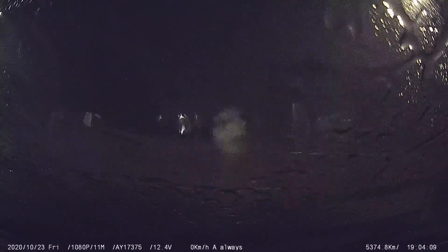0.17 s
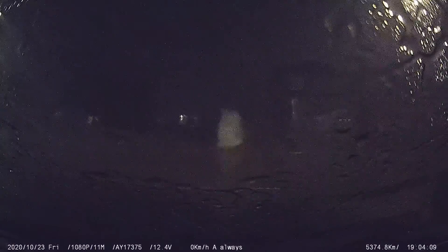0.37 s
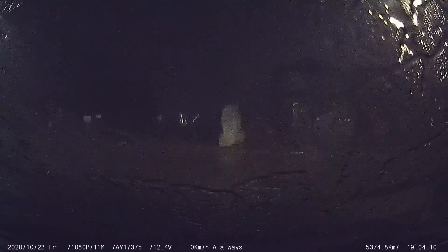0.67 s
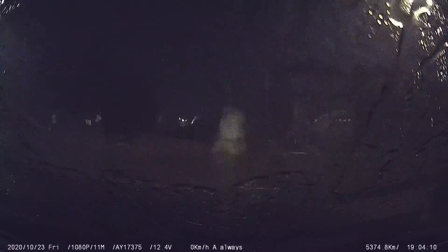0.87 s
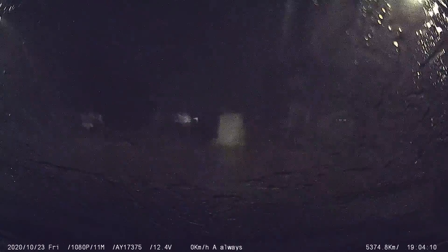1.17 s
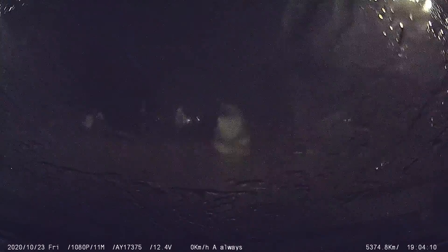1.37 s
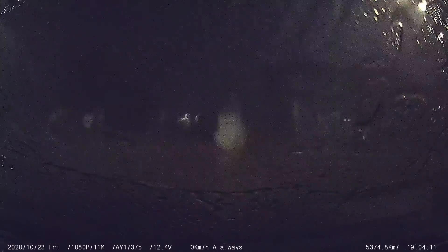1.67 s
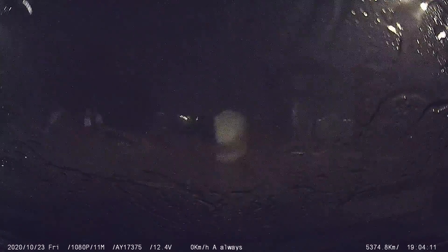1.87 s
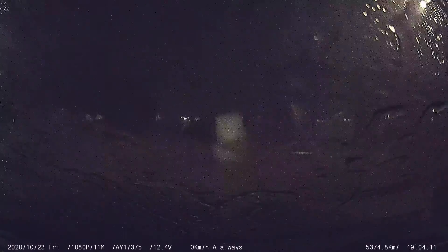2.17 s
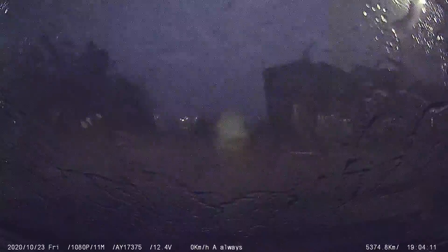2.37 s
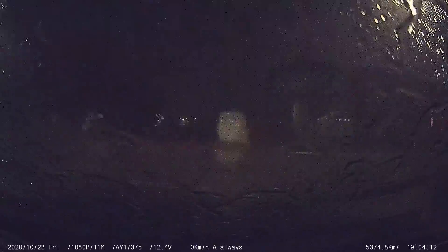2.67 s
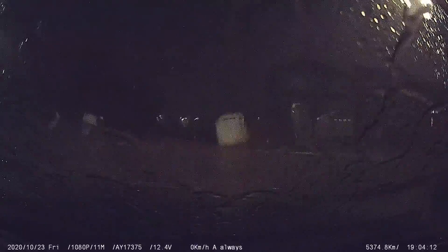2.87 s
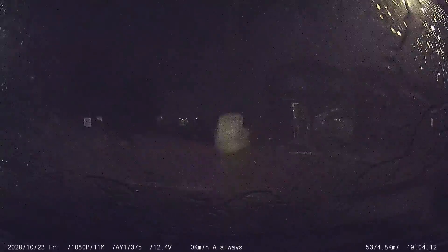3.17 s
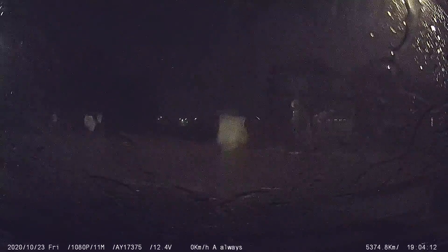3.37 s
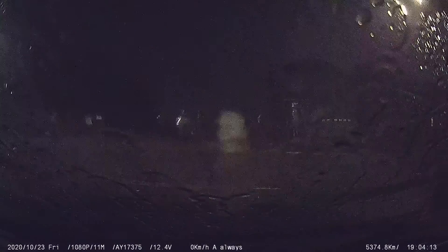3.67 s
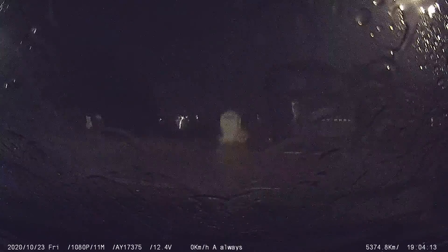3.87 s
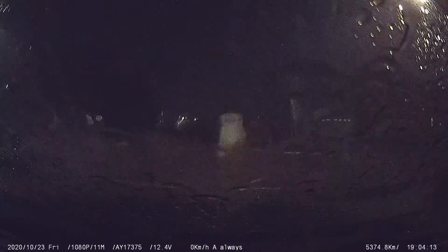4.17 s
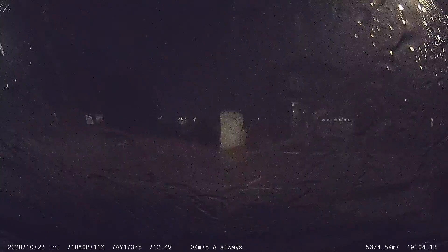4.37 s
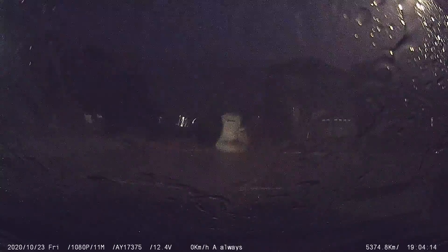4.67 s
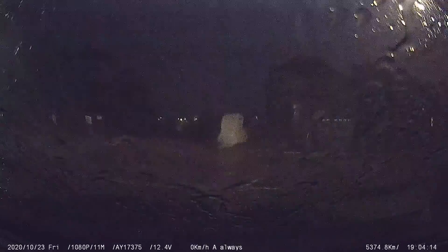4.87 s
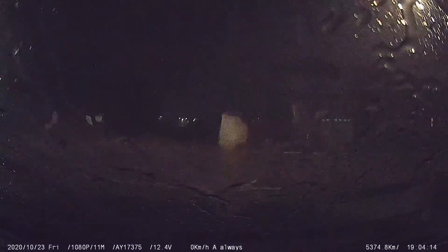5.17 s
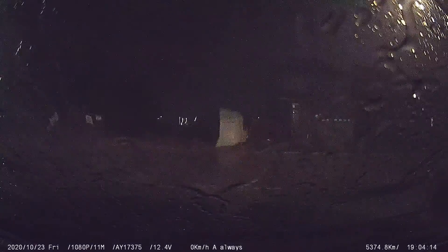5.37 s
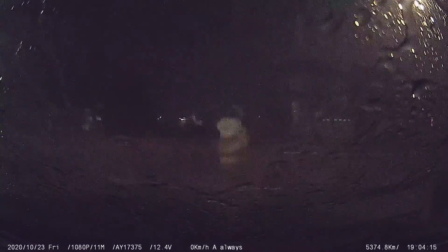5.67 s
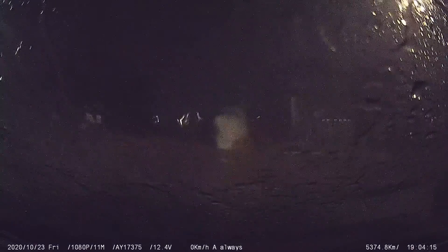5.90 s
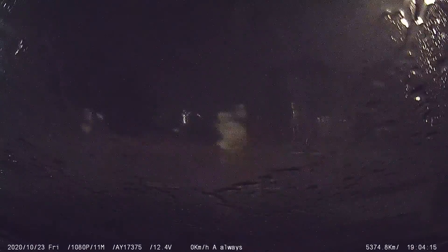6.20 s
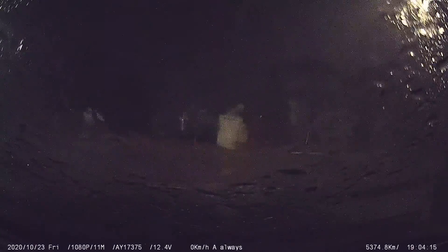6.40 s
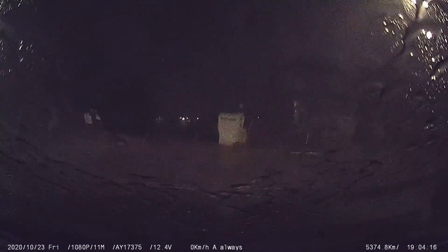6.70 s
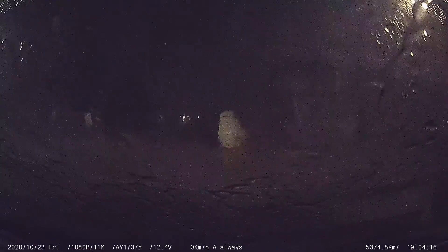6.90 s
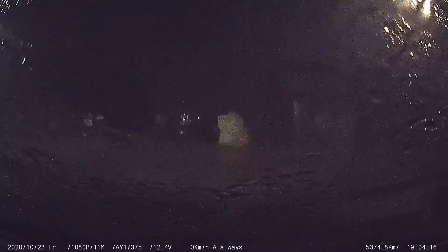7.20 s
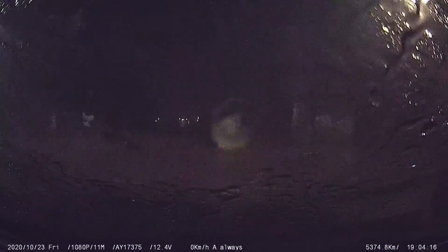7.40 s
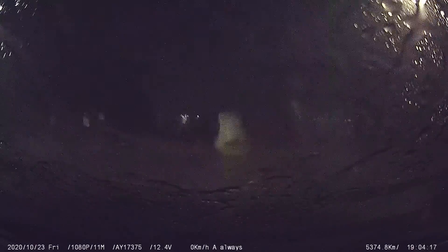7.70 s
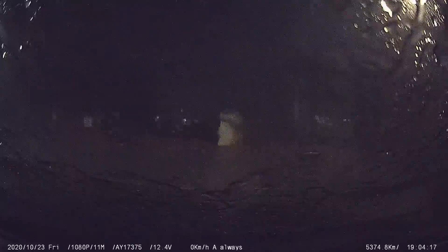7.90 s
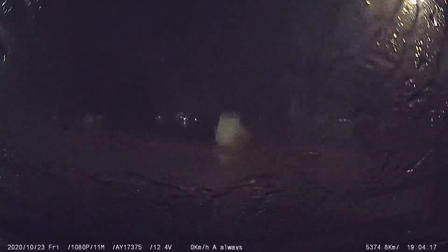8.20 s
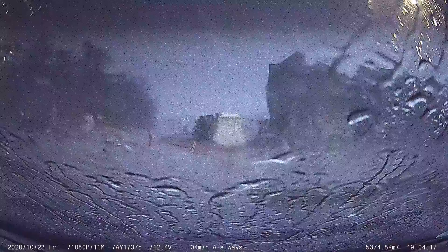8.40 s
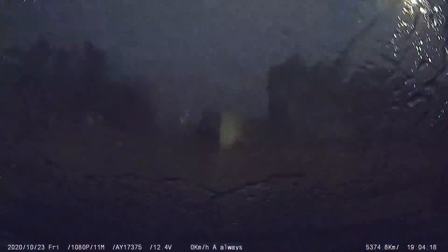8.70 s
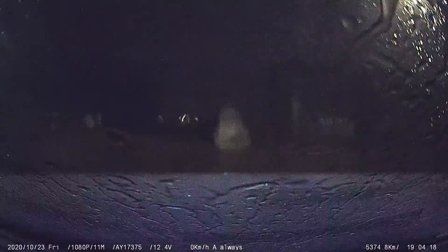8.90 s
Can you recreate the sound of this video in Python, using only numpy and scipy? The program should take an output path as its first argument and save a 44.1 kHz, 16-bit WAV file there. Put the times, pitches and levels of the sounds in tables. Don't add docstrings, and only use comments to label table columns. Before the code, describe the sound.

Heard from a small, dull-sounding microphone inside a parked car: steady rain rattles roof, panels and glass over low gusty rumble. Hailstones knock hard in the first two seconds, ease into lighter scattered hits, then a heavy surge arrives after six seconds with the hardest blow before eight. The rain then thins, with a few last knocks.

```python
import sys
import numpy as np
from scipy import signal
from scipy.fft import rfft, irfft
from scipy.io import wavfile
from scipy.ndimage import uniform_filter1d

SR = 44100
rng = np.random.default_rng(int(sys.argv[2]) if len(sys.argv) > 2 else 0)


def rack_gain(trim_db):
    fader = np.asarray(trim_db, float)
    return 10 ** (fader / 20)


def file_out(sig):
    cols = np.atleast_2d(sig).T
    lim = np.clip(cols, -1, 1)
    pcm = np.round(lim * 32767).astype(np.int16)
    wavfile.write(sys.argv[1], SR, pcm)


N = 399105
HZ = np.arange(8193) * SR / 16384


def causal(db):
    cepstrum = irfft(db * np.log(10) / 20)
    cepstrum[1:8192] *= 2
    cepstrum[8193:] = 0
    return irfft(np.exp(rfft(cepstrum)))[:6000]


def shape(points):
    hz, db = np.transpose(points)
    return np.interp(np.log(HZ + 1), np.log(hz), db)


def camera_db():
    average_hz, top_hz = 4000, 7760
    null_db = 1.32 * 20 * np.log10(np.abs(np.sinc(HZ / average_hz)) + 0.004)
    return null_db - np.clip((HZ - top_hz) * 0.3, 0, 34)


def before_camera(heard_db, hz):
    return heard_db - np.interp(hz, HZ, camera_db())


def band(lo_hz, hi_hz, db):
    lower_edge = 1 + (lo_hz / (HZ + 1)) ** 10
    upper_edge = 1 + (HZ / hi_hz) ** 8.7
    db = db - 10 * np.log10(lower_edge * upper_edge)
    heard_power = np.mean(rack_gain(2 * (db + camera_db())))
    return causal(db) / np.sqrt(heard_power)


def through(x, response):
    return signal.oaconvolve(x, response)[:N]


def running(x, response):
    lead = len(response)
    return signal.oaconvolve(np.concatenate([x[lead:0:-1], x]), response)[lead:lead + N]


def strikes(start_s, gain):
    return np.bincount(np.clip((start_s * SR).astype(int), 0, N - 1), gain, N)


def knocks(start_s, level_db, rise_s, t60_s, filt=through):
    t = np.arange(SR // 4) / SR
    fall = (1 - np.exp(-t / max(rise_s, 1e-4))) * rack_gain(-2 * 60 * t / t60_s)
    return np.maximum(filt(strikes(start_s, rack_gain(2 * level_db)), fall / fall.max()), 0)


def walk(rate_hz):
    hold = int(SR / rate_hz)
    steps = np.repeat(rng.standard_normal(N // hold + 1), hold)
    return 0.54 * uniform_filter1d(uniform_filter1d(steps, hold), hold)[:N]


def bumps(rows):
    t = np.arange(N) / SR
    return sum(db * np.exp(-((t - s) / half_s) ** 2) for s, db, half_s in rows)


# start_s, level_db
RAIN_LEVEL = [(0.0, -33), (0.58, -32.5), (1.1, -27.5), (1.51, -33), (1.9, -30), (2.37, -34.5),
              (2.75, -30.5), (3.12, -39.5), (3.6, -32.5), (4.3, -33), (4.65, -36.5), (5.85, -37),
              (6.35, -32.5), (6.6, -22.5), (7.0, -28.5), (7.48, -27.5), (7.7, -31), (9.05, -41)]
# centre_s, change_db, half_length_s
WATER_SHEETS = [(0.03, 0.5, 0.057), (0.78, -4, 0.052), (1.75, 3, 0.051), (2.16, 1.5, 0.044),
                (2.4, -1.5, 0.042), (2.97, 2, 0.14), (3.28, 1, 0.08), (4.7, -3, 0.065), (4.84, 5, 0.025),
                (5.16, 3, 0.12), (5.4, 1, 0.17), (5.44, 5.5, 0.012), (5.7, -1.5, 0.088), (6.1, 6, 0.019),
                (6.18, 4.5, 0.048), (6.48, 2, 0.11), (7.3, 1, 0.078), (7.86, 6.5, 0.026), (8.25, 3, 0.26),
                (8.55, 0.5, 0.092), (8.8, 2.5, 0.068), (7.08, 2.5, 0.025), (7.215, 2.5, 0.016),
                (7.258, -0.5, 0.013), (1.12, 2, 0.022), (3.2, -1.5, 0.08), (6.84, -1, 0.016),
                (6.6, -2.5, 0.035), (2.65, 3.5, 0.023), (2.0, 3, 0.085)]
USUAL_RAIN_DB = -32


def strength():
    drift_db = np.interp(np.arange(N) / SR, *np.transpose(RAIN_LEVEL))
    return drift_db - USUAL_RAIN_DB + bumps(WATER_SHEETS)


# freq_hz, level_db (per Hz)
WIND_SPECTRUM = [(15, -16.5), (30, 0), (60, -5), (80, -4), (120, -14.5), (200, -25.5)]
# centre_s, change_db (on the steady rumble), half_length_s
WIND_GUSTS = [(0.327, 4, 0.16), (1.656, 6.5, 0.047), (1.96, 6.5, 0.046), (3.455, -11, 0.094),
              (3.86, 4.5, 0.21), (4.89, 4.5, 0.3), (6.48, 7.5, 0.1), (6.78, 7.5, 0.071), (7.658, 1.5, 0.1),
              (8.24, 2, 0.15)]


def wind():
    gust_db = -44.5 + 0.39 * strength() + bumps(WIND_GUSTS)
    return rack_gain(gust_db) * running(rng.standard_normal(N), band(21, 170, shape(WIND_SPECTRUM)))


def hiss():
    top_noise, wide_noise = rng.standard_normal((2, N))
    top = rack_gain(-67) * through(top_noise, band(7100, 8800, 0 * HZ))
    wide = rack_gain(-71) * through(wide_noise, band(3100, 4900, 0 * HZ))
    return top + wide


def fat_drops():
    count = 1100
    when, pitch, size = rng.random((count, 3)).T
    level_db = USUAL_RAIN_DB + strength()[(when * N).astype(int)] - 4.5 + 11 * size ** 2
    t60_s = 0.017 + 0.06 * (when * count % 1)
    return list(zip(when * N / SR, level_db, 380 * 5.5 ** pitch, t60_s))


# start_s, peak_db (as heard), pitch_hz
ICE_PLINKS = [(0.015, -23.5, 1680), (0.025, -25, 740), (0.6255, -17, 810), (0.764, -23, 1370),
              (0.903, -35, 240), (0.989, -26, 720), (1.035, -25, 460), (1.039, -25, 1630),
              (1.104, -28, 1205), (1.1465, -27, 683), (1.26, -24, 387), (1.508, -28, 1744),
              (1.719, -24, 1360), (1.863, -34, 2260), (1.863, -22.5, 720), (1.865, -24, 977),
              (1.965, -29, 1040), (2.01, -24.5, 984), (2.364, -32, 1840), (2.366, -24, 215),
              (2.655, -25, 516), (2.729, -29, 1787), (2.936, -33.3, 1670), (3.641, -34, 1990),
              (3.669, -26.5, 1765), (3.668, -20, 1324), (3.736, -27, 496), (3.7705, -21, 2140),
              (3.87, -22, 756), (3.872, -24, 2045), (4.164, -26, 366), (4.379, -29, 1119),
              (4.497, -27, 790), (5.337, -26, 1936), (5.364, -28, 236), (5.433, -26, 645),
              (5.63, -33, 1550), (5.746, -31, 1130), (5.9, -27, 708), (6.245, -21, 756), (6.271, -35, 2530),
              (6.392, -23, 2090), (6.634, -29, 685), (6.668, -21, 1679), (6.668, -21, 1260),
              (6.802, -18, 502), (6.875, -25.1, 409), (7.077, -24, 1040), (7.37, -33, 2440),
              (7.37, -27, 1860), (7.5, -31.2, 1894), (7.857, -32, 2080), (7.959, -29, 1870),
              (8.248, -28, 1340), (8.252, -22.5, 874), (8.494, -30, 753), (8.729, -42, 1890),
              (8.763, -36, 1690), (8.933, -49, 2560), (9.028, -38.1, 1636)]


def plinks():
    return [(s, before_camera(db, hz) + 4, hz, 0.067) for s, db, hz in ICE_PLINKS]


# start_s, peak_db
GLASS_TAPS = [(0.016, -30), (0.1187, -37.1), (0.5727, -34), (0.626, -22), (0.9209, -34.0), (1.2571, -29),
              (1.32, -37), (1.3659, -34), (2.3028, -43.2), (2.55, -37), (2.7328, -37.6), (2.8226, -30),
              (3.2376, -43), (3.2895, -44.6), (3.3224, -39), (3.872, -28), (4.1436, -34), (4.2034, -32),
              (4.6444, -43), (4.9118, -40.8), (5.441, -20), (5.7609, -45.7), (5.7868, -43.4),
              (6.6499, -29.8), (6.8644, -33.1), (7.035, -34.3), (7.0649, -25.5), (7.1887, -35.3),
              (7.2805, -33.0), (7.3673, -34), (7.5319, -32), (7.917, -35), (7.938, -36.0), (7.9609, -32),
              (8.0607, -36), (8.2313, -37.3), (8.2542, -34), (8.4827, -38), (8.5077, -43), (8.7322, -36),
              (8.7641, -42.8)]


def light_taps():
    return [(s, db - 17, 24.5, 27.5) for s, db in GLASS_TAPS]


# start_s, body_peak_db, pitch_hz, hardness_db (glass relative to body)
HAILSTONES = [(0.114, -14.5, 690, -27), (0.209, -1, 1145, -13), (0.6265, -8.5, 820, -13.5),
              (0.764, -8, 1920, -8), (0.916, -10.5, 1093, -22), (1.074, 2, 690, -15),
              (1.22, -7, 747, -28), (1.565, -9.5, 477, -19), (1.586, -4.5, 789, -11.5),
              (1.866, -13.5, 662, -7.5), (3.42, -5, 766, -18.5), (3.772, -5, 1380, -11.5),
              (3.876, -6.5, 690, -11.5), (4.212, -14.5, 1420, -15), (5.34, -16, 778, -11),
              (5.443, -12.5, 1245, -9.5), (6.275, -8, 732, -13), (6.38, -11, 518, -8.5),
              (6.524, -8, 1080, -26), (6.638, -8.5, 690, -24), (6.672, -12, 485, -19),
              (6.804, -9.5, 763, -29), (6.945, -4.5, 635, -19), (7.288, -10.5, 944, -36),
              (7.345, -8, 960, -24.5), (7.509, -10.5, 667, -21.5), (7.615, 2.5, 717, -20),
              (7.852, -15, 1290, -20), (8.12, -15, 1183, -13.5), (8.94, -12, 760, -13),
              (0.018, -12, 1010, -24.5), (0.46, -22, 620, -23), (0.603, -13, 880, -23),
                (0.722, -13, 650, -23), (0.848, -15.5, 1280, -19), (0.985, -16.5, 956, -8.5),
                (1.146, -23.5, 754, -15), (1.514, -17.5, 796, -13), (1.714, -15, 583, -20),
                (2.056, -14, 837, -22), (2.551, -25, 590, -8), (2.864, -11.5, 1040, -23),
                (2.94, -16.5, 690, -22), (3.567, -22, 1470, -10), (3.672, -12.5, 430, -15),
                (3.858, -15, 1090, -22), (4.017, -16, 940, -11.5), (4.091, -16, 1230, -9),
                (4.339, -13, 396, -14.5), (4.44, -22, 1110, -11), (4.46, -16, 767, -13.5),
                (5.525, -16, 734, -25), (5.751, -17.5, 658, -36), (5.905, -17.5, 500, -30),
                (5.948, -16, 775, -36), (6.25, -16, 780, -33), (7.588, -16, 1044, -24),
                (7.705, -14.5, 510, -26), (8.222, -13.5, 496, -23), (8.483, -21, 1130, -30)]


def hailstones():
    return HAILSTONES


def stone_rings():
    rows = [(s, db - 10.5, hz, 0.09) for s, db, hz, _ in hailstones()]
    for s, db, *_ in hailstones():
        for octave_part in rng.random(4) + np.arange(4):
            rows.append((s, db - 19.5, 700 * 1.4 ** octave_part, 0.085))
    return rows


# start_s, peak_db, pitch_hz, t60_s
SHORT_MODES = [(0.02, -24, 1500, 0.051), (1.628, -20.5, 90, 0.11), (1.642, -20.5, 230, 0.07),
               (2.551, -17, 2010, 0.032), (3.4141, 0, 558, 0.022), (4.213, -11, 1370, 0.045),
               (5.3395, 0.5, 655, 0.01), (5.449, -12, 1330, .07), (6.2755, -16, 800, 0.018),
               (6.44, -21, 199, 0.1), (6.5, -22, 196, 0.18), (6.99, -22, 147, 0.11),
               (0.6267, -15, 1090, 0.016), (0.7648, -3, 1290, 0.018), (1.1468, -12, 800, 0.015),
               (4.017, -9, 1200, 0.015), (6.9454, -6.5, 900, 0.018), (7.2886, -5, 1020, 0.018),
               (7.623, -5, 1274, 0.046), (3.4945, -12, 1300, 0.013), (3.5087, -10.5, 1100, 0.014),
               (3.527, -11, 1250, 0.013)]


def short_modes():
    return list(SHORT_MODES)


# start_s, crack_peak_db, glass_db (relative to crack)
GLASS_PELLETS = [(0.0789, -36, -9), (0.1498, -24.5, 5), (9.032, -37.5, 8), (0.687, -26.5, 7.5),
                 (1.303, -23.5, -9), (1.488, -31, -6), (1.804, -31.5, -6), (1.931, -22.5, 9),
                 (2.154, -23, 2), (2.371, -23, 2), (2.409, -37, 8), (2.67, -27, -6), (3.138, -34, -9),
                 (3.3847, -26, 4), (4.266, -31, -8), (4.2915, -30.5, 4), (4.518, -34.5, 3),
                 (5.1512, -37, 15.5), (5.1869, -29, 7), (5.41, -47, 22), (5.882, -38, 16),
                 (6.114, -31.5, 6), (6.148, -41.5, 19.5), (6.242, -24.5, 0), (6.3932, -18.5, 5),
                 (6.4906, -26.5, 3), (6.534, -28.5, 5), (6.7937, -28, -5.5), (8.1637, -32, 17),
                 (8.351, -33, -6)]


def pellets():
    return [(s, db, glass_db, -8 - 0.8 * db) for s, db, glass_db in GLASS_PELLETS]


# start_s, peak_db, pitch_hz
ROOF_THUDS = [(0.116, -18, 329), (0.2, -35, 301), (0.618, -26, 314), (0.899, -39, 207), (1.063, -17, 337),
              (1.216, -27, 215), (1.337, -23, 360), (1.64, -23, 219), (1.867, -20.5, 223),
              (2.149, -23, 380), (2.74, -23, 215), (3.414, -18, 397), (3.567, -18.5, 191), (3.67, -26, 218),
              (3.776, -24, 334), (4.205, -20, 391), (4.333, -24.5, 215), (4.817, -22, 344),
              (6.068, -20.5, 192), (6.377, -20.5, 323), (6.657, -20, 331), (7.542, -24.5, 191),
              (7.6132, -10, 336), (8.227, -24, 219), (8.387, -25, 197), (8.491, -20, 197),
              (8.644, -23, 310), (8.937, -17.5, 225)]


def thuds():
    return [(s, db - 1.5, hz, 0.1) for s, db, hz in ROOF_THUDS]


# start_s, body_peak_db, pitch_hz
LONE_DROPS = [(0.1237, -10, 706), (0.4074, -22, 1076), (0.458, -26, 615), (1.3559, -18.5, 592),
              (1.3932, -20.5, 1087), (1.8608, -16.5, 518), (1.9312, -14, 498), (2.3666, -23, 721),
              (2.4273, -22.4, 450), (2.5666, -17, 516), (4.4378, -22, 1170), (4.768, -23, 1184),
              (5.6613, -24.5, 506), (6.6687, -18, 1200), (8.0587, -18.5, 750), (8.4894, -17.5, 1096),
              (8.5845, -25, 665), (8.759, -19, 509)]


def patter_knocks():
    return [(s, db - 1, hz, -24) for s, db, hz in LONE_DROPS]


def patter_rings():
    return [(s, db - 2, hz, 0.06) for s, db, hz in LONE_DROPS]


# start_s, peak_db, pitch_hz, t60_s
HEAVY_MODES = [(0.207, -17, 1130, 0.1), (0.7654, 5, 1926, 0.04), (1.074, 10, 1110, 0.033),
               (1.5853, -9.5, 1032, 0.13), (3.413, -7, 1393, 0.06), (3.7751, 11.5, 1390, 0.033),
               (3.879, -14, 2104, 0.074), (5.3398, -7, 2000, 0.058), (5.441, -19, 1320, 0.1),
               (6.277, -3.5, 1650, 0.038), (7.6164, -4, 1480, 0.075), (8.9385, -3.5, 1820, 0.032)]


def heavy_rings():
    return [(s, db - 7, hz, t60_s) for s, db, hz, t60_s in HEAVY_MODES]


# start_s, peak_db (as heard), pitch_hz
STONE_VOICES = [(0.2074, -5, 960), (0.2089, -10, 1620), (0.215, -12, 1355), (0.626, -27, 2310),
                (0.6262, -26, 990), (0.763, -17, 1324), (0.763, -18, 1480), (0.768, -26, 925),
                (1.0753, -25, 2901), (1.0765, -10, 1320), (1.218, -19, 984), (1.218, -15, 540),
                (1.583, -22, 2140), (1.5928, -23, 1400), (1.862, -14.5, 508), (1.8645, -21, 724),
                (1.8669, -19, 1012), (3.4177, -16, 1001), (3.566, -26.6, 1660), (3.5672, -26, 870),
                (3.77, -22, 1510), (3.7746, -7, 1250), (3.872, -18.5, 2400), (3.8738, -15.5, 2260),
                (3.873, -21, 1685), (4.015, -34, 735), (4.0172, -24, 1850), (4.2049, -26, 608),
                (4.2101, -31, 974), (4.461, -26, 1889), (5.338, -26.0, 970), (5.3381, -28, 2470),
                (5.3381, -17, 745), (5.4412, -22, 2260), (5.4523, -28, 2034), (6.274, -22, 2100),
                (6.274, -26, 1470), (6.2834, -19, 890), (6.3881, -29.2, 2270), (6.3884, -20, 634),
                (6.3948, -25.0, 1280), (6.9452, -11, 1125), (7.344, -28, 1824), (7.343, -22, 1168),
                (7.611, -16, 1794), (7.6144, -6.5, 1586), (7.615, -22, 800), (8.109, -19, 700),
                (8.119, -25, 1810), (8.937, -18, 450), (8.937, -18.5, 620), (8.9375, -27, 1480)]


def voices():
    return [(s, before_camera(db, hz) + 2, hz, 0.052) for s, db, hz in STONE_VOICES]


# start_s, crack_peak_db, glass_db, body_db (both relative to crack)
STONE_TICKS = [(0.2078, -19, 19.5, 10), (0.613, -29, 13, 9), (0.627, -16, 0, 12), (0.7505, -29, 14.5, 11),
               (0.7652, -20, 14.5, 12), (0.9877, -24, 4, 10), (1.077, -23, 0, 15), (1.1465, -22.5, 8.5, 13),
               (1.5693, -32, 2, 16), (1.5878, -38, 6, 15), (1.8635, -29, 3, 15), (2.5506, -35, 15, 17),
               (3.4155, -22, 14, 8.7), (3.5686, -20, 7, 3), (3.6696, -30, 9, 21), (3.7706, -22.5, 22, 25),
               (3.8732, -32, 19, 13), (4.016, -43, 7, 16), (4.2028, -24.5, 10.5, 20.4),
               (4.3402, -22, -1, 7), (4.4608, -42, 24.5, 17), (5.3393, -19, 14, 5.2),
               (6.2756, -27, 14, 27.5), (6.947, -21.5, -7, 15), (7.3444, -48, 12, 21),
               (7.5827, -39, 17.5, 19), (7.6126, -8.5, 12.5, 24), (7.8524, -22, -5, 6.9),
               (8.1196, -33, 18, 32.3), (8.938, -25, 9.5, 9)]


def stone_ticks():
    return list(STONE_TICKS)


# start_s, crack_peak_db
ICE_GRAINS = [(0.295, -37), (0.3194, -41.5), (0.409, -38), (0.5142, -45), (0.7183, -44), (0.8422, -39),
              (0.904, -33), (1.1747, -39), (1.2211, -41), (3.117, -45.5), (3.714, -42), (3.8357, -44),
              (3.8581, -38), (4.0582, -44), (4.089, -38), (4.139, -40), (4.4388, -41), (4.6862, -47),
              (5.2886, -40), (5.6171, -50), (5.8137, -47), (7.7218, -41.5), (7.7872, -41), (7.9425, -39),
              (7.9628, -39.5), (8.209, -42), (8.734, -50), (8.767, -44)]


def grains():
    return [(s, db + 3, 8.5, 8) for s, db in ICE_GRAINS]


# freq_hz, level_db (per Hz)
SHELL_COLOUR = [(100, 4), (200, -2.5), (500, -0.5), (1000, -0.5), (1400, -1), (2000, -5), (2750, -12.5),
                (3200, -6.5), (3800, -7.5), (4500, -17), (5300, -14.5), (6000, -23.5), (7000, -16.5),
                (7700, -12.5)]
# freq_hz, width_hz, gain_db
CABIN_MODES = [(215, 51, 8.5), (335, 34, 6.5), (745, 29, 4.5)]


def cabin_colour():
    resonances = sum(db / (1 + (2 * (HZ - hz) / width_hz) ** 2) for hz, width_hz, db in CABIN_MODES)
    return shape(SHELL_COLOUR) + resonances


# low_hz, high_hz, rise_s, drop_t60_s, spray_db, stone_t60_s, stone_offset_db, tap_db
SHELL_RANGES = [
    (426, 2240, 0.0014, 0.076, -10.5, 0.12, -12, -5),
    (123.5, 568, 0.0075, 0.094, -13, 0.083, -4, -5.5),
    (1850, 4670, 0.00092, 0.064, -14.5, 0.09, -4, -0.5),
    (3880, 7800, 0.004, 0.02, -7, 0.082, 0.5, -7),
]
# level_db (at usual strength), slope (dB per dB of strength)
RAIN_FOLLOW = [
    (-32, 1),
    (-36.5, 0.56),
    (-47, 1.5),
    (-60, 1.2),
]


def shell():
    colour, rain_strength, drop_count = cabin_colour(), strength(), 3600
    ticks = [*stone_ticks(), *pellets(), *grains(), *light_taps()]
    tick_s, crack_db, glass_db, body_db = np.transpose(ticks)
    stone_s, peak_db, _, hard_db = np.transpose([*hailstones(), *patter_knocks()])
    stone_db = peak_db + np.array([0 * peak_db, -18 - 0.25 * peak_db, hard_db, hard_db - 18])
    tick_db = crack_db + np.array([body_db - 6.5, body_db - 17.5, glass_db, 0 * body_db])
    when, size, side = rng.random((drop_count, 3)).T
    drop_s = when * N / SR
    out = 0
    for k, (lo, hi, rise_s, drop_t60, spray_db, stone_t60, offset_db, tap_db) in enumerate(SHELL_RANGES):
        response = band(lo, hi, colour)
        size_db = -2.5 * np.log(1.01 - size) + 2.1 * rng.standard_normal(drop_count)
        drops = knocks(drop_s, size_db, rise_s, drop_t60, running)
        usual_db, slope = RAIN_FOLLOW[k]
        scale = rack_gain(usual_db + slope * rain_strength + walk(14)) / np.sqrt(drops.mean())
        spray = drops.mean() * rack_gain(spray_db)
        rain = (drops + spray) * scale ** 2
        stones = knocks(stone_s - 0.001, stone_db[k] + offset_db, rise_s, stone_t60)
        tick_knocks = knocks(tick_s, tick_db[k] - 10, 1 / 5000, 0.027)
        rattle = np.sqrt(rain + stones + tick_knocks) * rng.standard_normal(N)
        drop_taps = strikes(drop_s, np.sign(side - 0.5) * rack_gain(1.6 * size_db - 2 + tap_db))
        taps = scale * drop_taps - strikes(tick_s, rack_gain(tick_db[k] - 0.5))
        tap_peak = np.abs(through(response, causal(camera_db()))).max()
        out = out + running(rattle + taps / tap_peak, response)
    return out


def rings():
    out, t = np.zeros(N + SR), np.arange(SR // 10) / SR
    rain_modes = [*fat_drops(), *plinks(), *patter_rings()]
    hail_modes = [*stone_rings(), *short_modes(), *thuds(), *heavy_rings(), *voices()]
    for s, db, hz, t60_s in rain_modes + hail_modes:
        i = int(s * SR)
        swell = (1 - np.exp(-t / 0.0013)) * rack_gain(-60 * t / max(t60_s, 0.01))
        out[i:i + len(t)] += rack_gain(db) * swell * np.sin(2 * np.pi * hz * t)
    return out[:N]


def scene():
    return (shell() + rings() + wind() + hiss())[None]


def top_cut(x):
    return signal.sosfilt(signal.butter(12, 8310, fs=SR, output="sos"), x)


def record(dry):
    soft = 0.83 * np.tanh(dry[0] / 0.9)
    mix = running(soft, causal(camera_db()))[None]
    return top_cut(mix)


dry = scene()
out = record(dry)
file_out(out)
```